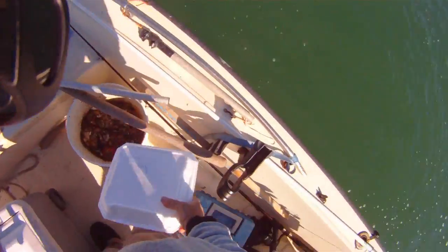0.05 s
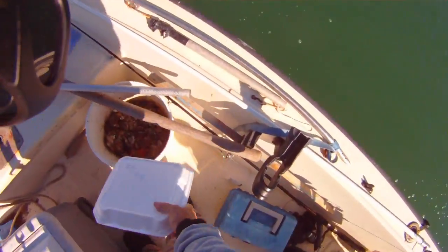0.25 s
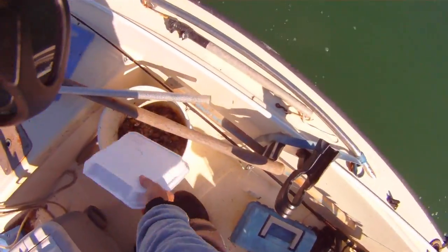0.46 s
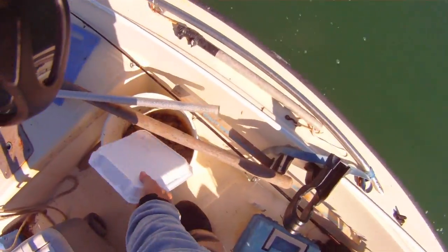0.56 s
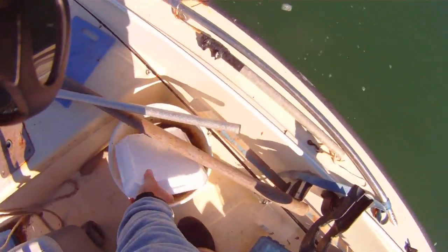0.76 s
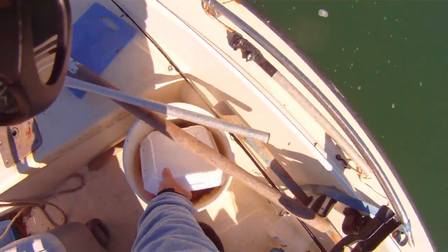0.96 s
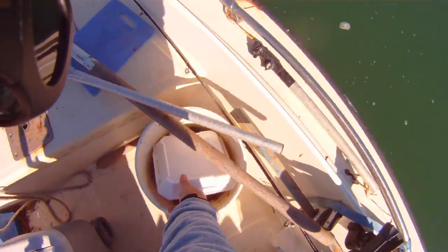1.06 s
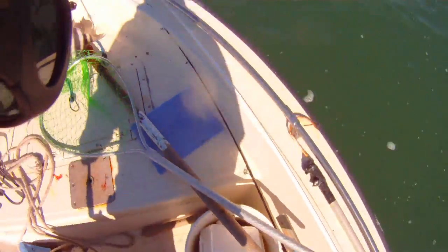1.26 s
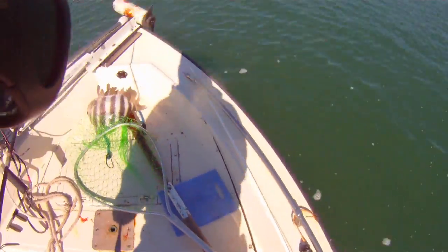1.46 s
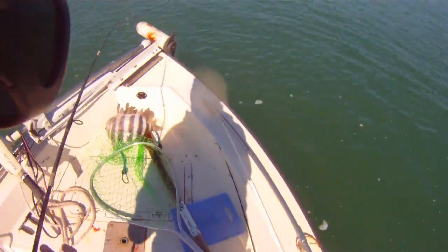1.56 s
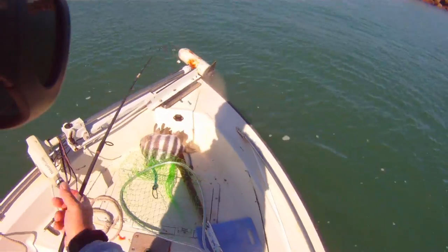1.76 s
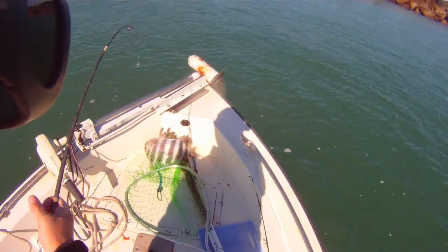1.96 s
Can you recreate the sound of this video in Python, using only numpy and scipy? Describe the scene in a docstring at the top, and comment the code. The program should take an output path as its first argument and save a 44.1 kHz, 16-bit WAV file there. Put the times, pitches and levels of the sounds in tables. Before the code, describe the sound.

A light foam box is pushed into a bucket: sharp taps and hollow knocks, then a gritty scrape as it seats. Behind it a sleeve rustles, water washes along the boat's hull and wind briefly buffets the microphone.

```python
"""A light foam box is pushed into a bucket on a small boat's deck: sharp rim taps, hollow knocks,
then a gritty stick-slip scrape and a boom of the wall as it seats. Each hit is a quick flex of the
wall with a ringing tail and scatter off the deck. Behind it a sleeve rustles, water washes along
the hull and wind buffets the microphone late on; a thin electrical whine and hiss run throughout."""
import sys
import numpy as np
from scipy import signal
from scipy.fft import rfft, irfft
from scipy.io import wavfile

SR = 44100
rng = np.random.default_rng(int(sys.argv[2]) if len(sys.argv) > 2 else 0)


def transcribe(signal):
    """Save signal, clipped to [-1, 1], as a 16-bit WAV file at the path in sys.argv[1]."""
    frames = np.atleast_2d(signal).T
    limited = np.clip(frames, -1, 1)
    pcm = np.round(limited * 32767).astype(np.int16)
    wavfile.write(sys.argv[1], SR, pcm)


N = 88200


def undb(db):
    """Decibels to gain."""
    return 10 ** (np.asarray(db) / 20)


def unit(x):
    """Normalise to rms 1."""
    return x / np.sqrt(np.mean(x ** 2))


def clock():
    """Time of every sample, in seconds."""
    return np.arange(N) / SR


def envelope(points):
    """Gain envelope through (t/s, level/dB) breakpoints."""
    times, db = np.array(points).T
    return undb(np.interp(clock(), times, db))


def equalise(x, eq):
    """Shape x with an (f/Hz, level/dB) curve, rolling off above the last point; rms 1."""
    hz, db = np.array(eq).T
    f = np.maximum(np.arange(N // 2 + 1) * SR / N, 1)
    gain = undb(np.interp(np.log(f), np.log(hz), db))
    rolloff = np.minimum(1, hz[-1] / f) ** 2
    return unit(irfft(rfft(x) * gain * rolloff, N))


def noise(eq):
    """Coloured noise, rms 1."""
    return equalise(rng.standard_normal(N), eq)


def wobble(per_s):
    """Random modulator with a spread near 1."""
    return 1.2 * np.interp(clock() * per_s, np.arange(1000), rng.standard_normal(1000))


def clicks(per_s, spread_db):
    """Randomly timed clicks of uneven size."""
    impulses = (rng.random(N) < per_s / SR) * rng.choice([-1, 1], N)
    return impulses * undb(spread_db * np.minimum(rng.standard_normal(N), 2.5))


# airy tone of the microphone hiss: f/Hz, level/dB
HISS_EQ = [(3000, -30), (6000, -3), (9000, -2.5), (12000, -4), (15500, -5)]


def electronics():
    """A thin whine over hiss; its pitch skips up in short, regular blips that make it buzz."""
    whine_hz, skip_hz, blips_per_s, duty = 7897.1, 420, 59.8, 0.073
    blip = ((blips_per_s * clock()) % 1 < duty) * 1.
    hz = whine_hz + skip_hz * (blip - blip.mean())
    whine = np.sqrt(2) * np.sin(2 * np.pi * np.cumsum(hz) / SR)
    return undb(-53.3) * whine + undb(-58.5) * noise(HISS_EQ)


# gentle swell of the water bed: t/s, level/dB
WATER_SWELL = [(0, -40), (.2, -39.5), (.4, -38), (.62, -39.5), (1.2, -37.5), (1.5, -39), (1.66, -40.5),
               (2, -37.5)]
# tone of water on the hull: f/Hz, level/dB
WATER_EQ = [(15, -45), (25, -19.5), (91, -15.5), (157, -15), (297, -8), (367, -5.5), (413, -6), (589, -3),
            (662, -3), (745, -3), (800, -3), (989, -4), (1140, -7), (1590, 2), (1960, -4.5), (2310, -3),
            (2540, -4.5), (3290, -5.5), (3880, -9.5), (5530, -26), (7000, -36.5), (9100, -44),
            (15400, -120)]


def water():
    """A steady, lightly fluttering wash along the hull with fine splashes in it."""
    splashes = unit(clicks(per_s=1800, spread_db=3.0))
    flutter = undb(wobble(per_s=40))
    wash = equalise(rng.standard_normal(N) + 0.57 * splashes, WATER_EQ)
    return envelope(WATER_SWELL) * flutter * wash


# wind bumps: t/s, level/dB, half length/s
WIND_BUFFETS = [(1.525, -34.5, 0.0041), (1.559, -32, 0.0075), (1.582, -30, 0.0028), (1.599, -45, .018),
                (1.824, -38, .008), (1.862, -44, 0.0097), (1.905, -44, 0.011)]
# the breeze builds as the microphone turns into it: t/s, level/dB
BREEZE_RISE = [(1.3, -72), (1.38, -59), (1.49, -59), (1.62, -52), (1.68, -52), (1.79, -45.5), (1.86, -43),
               (2, -45)]
# low rumble of the wind: f/Hz, level/dB
WIND_EQ = [(20, -23), (55, -7), (110, -3.5), (190, -1.5), (290, 0), (420, -4), (600, -10), (1000, -20),
           (2500, -35)]


def wind():
    """Short, low buffets on the microphone over a rising breeze."""
    t = clock()
    buffets = sum(undb(db) * np.exp(-((t - at) / half_s) ** 2 / 2) for at, db, half_s in WIND_BUFFETS)
    return (buffets + envelope(BREEZE_RISE)) * noise(WIND_EQ)


# cloth swishes: t/s, level/dB
SLEEVE_MOVES = [(.38, -69), (.44, -40), (.5, -67), (.59, -42), (.64, -60), (1.15, -76), (1.28, -47.5),
                (1.34, -37.5), (1.38, -38.5), (1.41, -37), (1.435, -49), (1.53, -60), (1.56, -36.5),
                (1.58, -55), (1.66, -58), (1.85, -50), (1.92, -44.5), (2, -40.5)]
# papery tone of the cloth: f/Hz, level/dB
SLEEVE_EQ = [(300, -11), (1000, -13), (1600, 4.5), (2500, -20), (3400, 2), (4200, -2.5), (5300, -22),
             (9000, -25), (15000, -45)]


def sleeve():
    """A sleeve crackles finely as the arm moves."""
    return envelope(SLEEVE_MOVES) * equalise(clicks(per_s=2500, spread_db=1.5), SLEEVE_EQ)


# moments where the rims bite: t/s, length/s, level/dB
RIM_BITES = [(0.673, .06, -54), (0.766, 0.019, -45), (0.918, 0.045, -49), (0.98, 0.071, -47.5),
             (1.01, 0.011, -47.5), (1.046, 0.011, -38.5), (1.064, 0.013, -54.5)]
# sizzling tone of the grit: f/Hz, level/dB
RASP_EQ = [(1500, -32), (4200, -7), (5800, -10), (7000, 2), (8000, -2.5), (9700, -1), (10800, -9.5),
           (13000, -15), (15500, -20)]


def rasp(attack_s=0.0016, release_s=0.012):
    """Bright grit with a hard attack each time the rims bite."""
    t = clock()
    gate = np.zeros(N)
    for at, length_s, db in RIM_BITES:
        attack = np.clip((t - at) / attack_s, 0, 1)
        release = np.exp(-np.maximum(t - at - length_s, 0) / release_s)
        gate += undb(db) * attack * release
    return gate * equalise(clicks(per_s=5300, spread_db=3), RASP_EQ)


# firmness of the rub as the box slides in: t/s, level/dB
RUB_PRESSURE = [(.63, -51), (.665, -37.5), (.69, -31.5), (.708, -34.5), (.718, -28.5), (.733, -25),
                (.745, -52), (.762, -41), (.775, -28.5), (.79, -28), (.803, -38), (.86, -43.5), (.915, -34),
                (.924, -30.5), (.945, -25), (.972, -42), (.986, -26.5), (1.015, -23.5), (1.043, -24.5),
                (1.053, -19), (1.078, -29.5), (1.11, -40.5), (1.15, -71)]
# tone of foam rubbing against the bucket's wall: f/Hz, level/dB
RUB_EQ = [(88, -65), (150, -46), (234, -10), (359, -33), (526, -15), (567, -26.5), (736, -1.5), (940, -6),
          (1440, -1.5), (1630, -4.5), (1790, 1.5), (1960, -10), (2110, -7), (2740, -6), (3900, -1.5),
          (5800, -35), (7540, -62), (12800, -120)]
# swell of the wall's boom as the box seats: t/s, level/dB
BOOM_SWELL = [(.96, -92), (.985, -28), (1.008, -39), (1.04, -36), (1.056, -23.5), (1.08, -34.5),
              (1.13, -88)]
# mid-heavy tone of that boom: f/Hz, level/dB
BOOM_EQ = [(100, -55), (350, -21), (550, -7), (750, 3), (1350, 2.5), (2000, -10), (4000, -17)]


def scrape(flicker_db=1.9):
    """Foam sticks and slips against the bucket in dense clicks; the wall booms as the box seats."""
    slips = clicks(per_s=8300, spread_db=-0.5) * undb(flicker_db * wobble(per_s=200))
    rub = equalise(slips, RUB_EQ)
    boom = equalise(clicks(per_s=3500, spread_db=-1.5), BOOM_EQ)
    return envelope(RUB_PRESSURE) * rub + envelope(BOOM_SWELL) * boom


def decay(age, t60):
    """A tail that drops 60 dB every t60 seconds."""
    return np.exp(-np.log(1000) * np.minimum(age / t60, 10))


def flex(t, hz, half_s, fall_oct_s):
    """The wall's transient, centred on t = 0: a tiny downward chirp, as the treble arrives first."""
    pitch = hz * 2 ** (-fall_oct_s * np.clip(t, -2 * half_s, 2 * half_s))
    cycles = np.cumsum(pitch) / SR
    contact = np.exp(-abs(t / half_s) ** 3)
    return contact * np.cos(2 * np.pi * (cycles - np.interp(0, t, cycles)))


def wall_hits(hits, modes, scatter_eq, fall_oct_s, rise_s, scatter_db, tail_db):
    """Each hit flexes the wall, then its modes ring and the deck scatters the sound."""
    out = np.zeros(N)
    for at, db, hz, half_s, ring_db in hits:
        t = clock() - at
        out += undb(db) * flex(t, hz, half_s, fall_oct_s)
        age = np.maximum(t + half_s, 0)
        ring = sum(undb(mode_db) * decay(age, t60) * np.sin(2 * np.pi * f * age + rng.uniform(0, 2 * np.pi))
                   for f, mode_db, t60 in modes)
        scatter_fade = decay(age, t60=0.051) + undb(tail_db) * decay(age, t60=0.13)
        scatter = undb(scatter_db) * scatter_fade * noise(scatter_eq)
        attack = 1 - np.exp(-(age / rise_s) ** 2)
        out += undb(ring_db) * attack * (ring + scatter)
    low_cut = signal.butter(2, 248, "high", fs=SR, output="sos")  # the light wall radiates no bass
    return signal.sosfilt(low_cut, out)


# knock cues: t/s, flex level/dB, f/Hz, half length/s, ring level/dB
KNOCK_HITS = [(.2945, -10.5, 1860, .0026, -17.5), (.3755, -27.5, 1630, .002, -31),
              (.663, -42, 1432, .002, -41), (.8238, -13, 1700, 0.00162, -30),
              (.9602, -9, 1770, 0.0022, -20.5), (1.581, -32.5, 880, 0.0019, -39)]
# resonances of the hollow body: f/Hz, level/dB, t60/s
BODY_MODES = [(468.4, -1, 0.052), (705, -13, 0.1), (886, 0.5, 0.028), (1160, -7, 0.053), (1400, -6, 0.043),
              (1586, 2.5, 0.045), (1727, 0.5, .055), (2110, -9, 0.05), (3330, -11, .03), (3510, -14, 0.02)]
# tone of the deck's scatter after a knock: f/Hz, level/dB
KNOCK_SCATTER_EQ = [(120, -45), (300, -51), (470, 1.5), (700, -1.5), (1100, -19), (1600, 2.5), (2600, -13),
                    (3700, -12), (4900, -40), (15000, -55)]


def knocks():
    """Round hits that ring the hollow body."""
    return wall_hits(KNOCK_HITS, BODY_MODES, KNOCK_SCATTER_EQ,
                     fall_oct_s=136, rise_s=0.00074, scatter_db=-0.5, tail_db=-15)


# tap cues: t/s, flex level/dB, f/Hz, half length/s, ring level/dB
TAP_HITS = [(.2278, 3, 3500, 0.00072, -15), (.4485, -42, 2940, .0008, -34), (.8128, -21, 3920, 0.0011, -37),
            (.8215, -4, 3254, 0.000914, -18.5), (.8234, -7.5, 3050, .0007, -26),
            (.978, -25, 4200, 0.00064, -39), (1.2, -30, 2340, 0.00097, -35.5),
            (1.407, -26.5, 3830, 0.00091, -41), (1.417, -32, 3880, .001, -50)]
# resonances of the rim: f/Hz, level/dB, t60/s
RIM_MODES = [(438, -17, 0.042), (730, -18, 0.11), (1247, -11.5, 0.079), (1486, -4.5, 0.061),
             (1810, 3, 0.04), (2283, 2, 0.035), (3110, -4, .038), (3160, 1.5, 0.027), (3424, -29, 0.022),
             (3837, 0.5, 0.048)]
# tone of the deck's scatter after a tap: f/Hz, level/dB
TAP_SCATTER_EQ = [(200, -38), (450, -14), (1500, -6), (2600, -3.5), (3200, 9.5), (4000, -1), (4700, -12.5),
                  (6500, -23), (15000, -43)]


def taps():
    """Sharp, bright hits that ring the rim, with a tight tail."""
    return wall_hits(TAP_HITS, RIM_MODES, TAP_SCATTER_EQ,
                     fall_oct_s=63, rise_s=0.00065, scatter_db=0.5, tail_db=-39)


def scene():
    """Mono mix: the foam box and bucket up front, over cloth, water, wind and whine."""
    box = taps() + knocks() + scrape() + rasp()
    return (box + sleeve() + water() + wind() + electronics())[None]


def record(dry):
    """The loudest tap clips at full scale; a steep high cut takes off the very top."""
    high_cut = signal.ellip(8, .2, 70, 15500, fs=SR, output="sos")
    return signal.sosfilt(high_cut, np.clip(dry, -1, 1))


dry = scene()
out = record(dry)
transcribe(out)
```